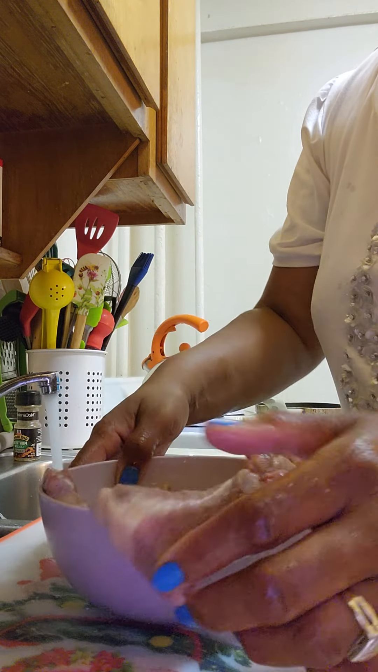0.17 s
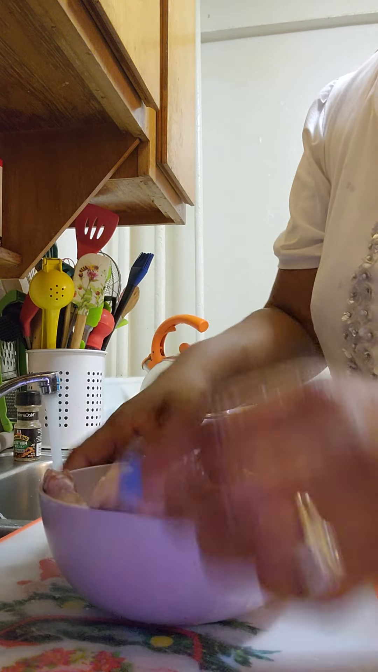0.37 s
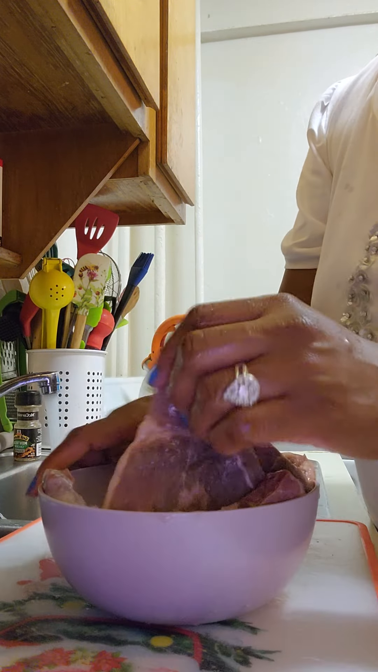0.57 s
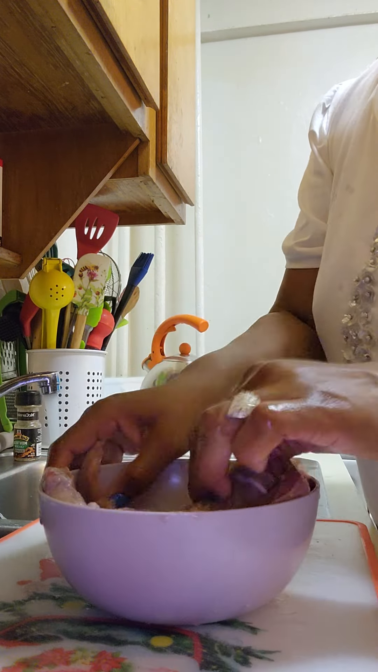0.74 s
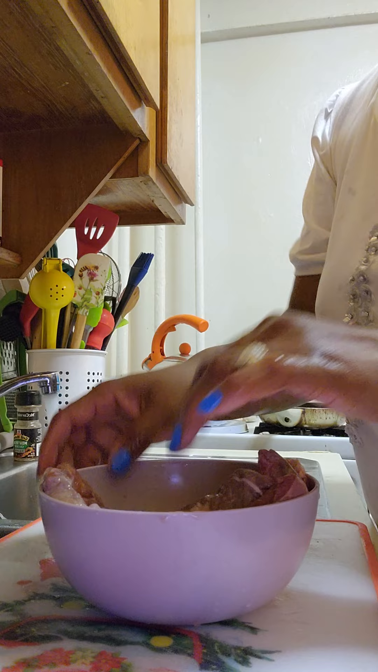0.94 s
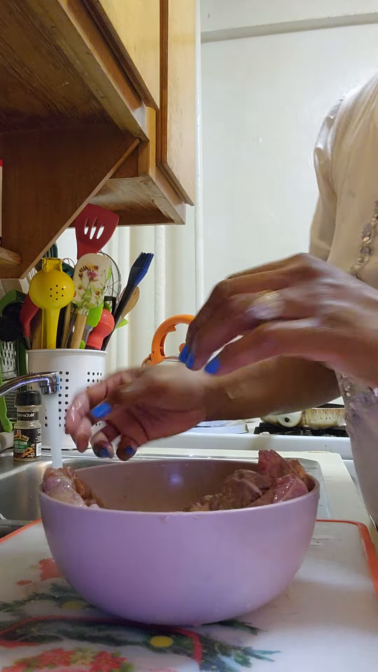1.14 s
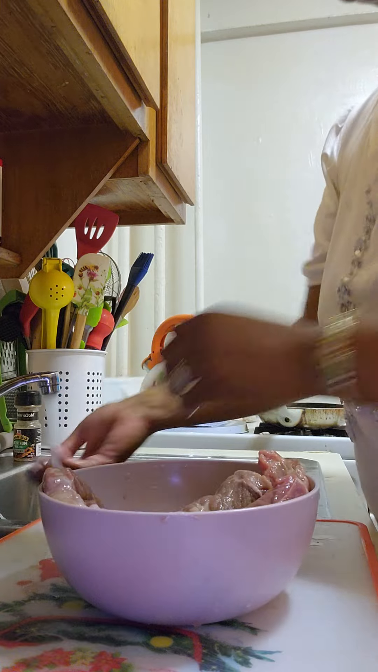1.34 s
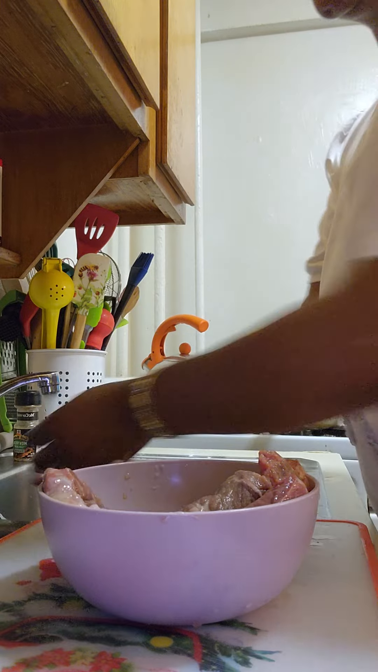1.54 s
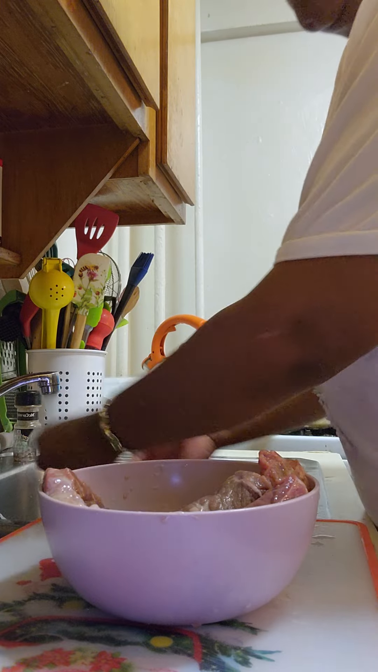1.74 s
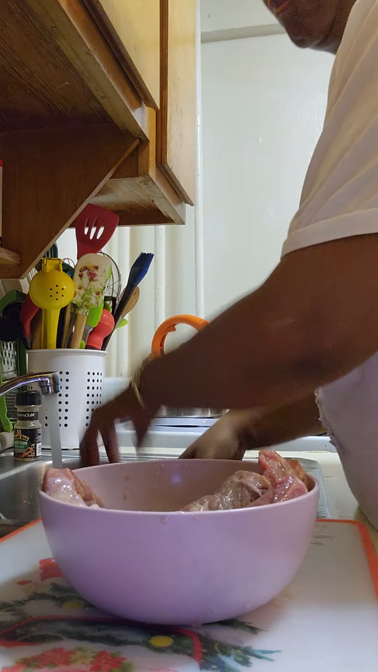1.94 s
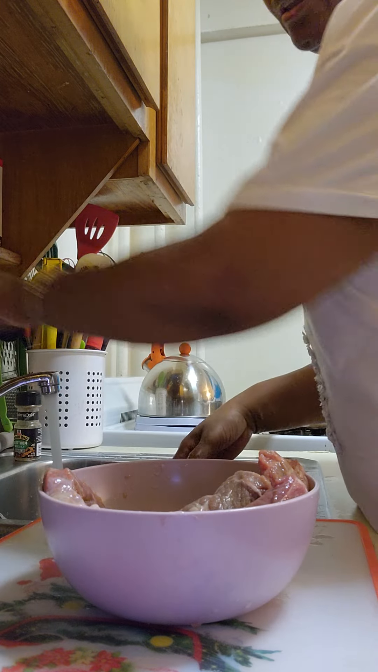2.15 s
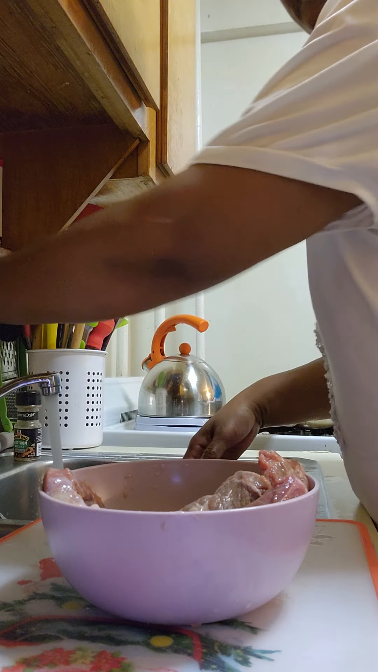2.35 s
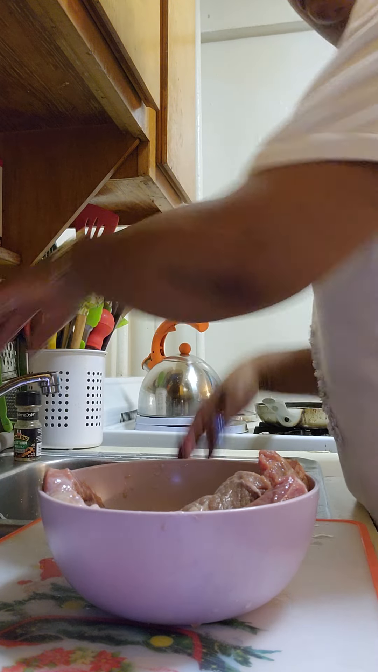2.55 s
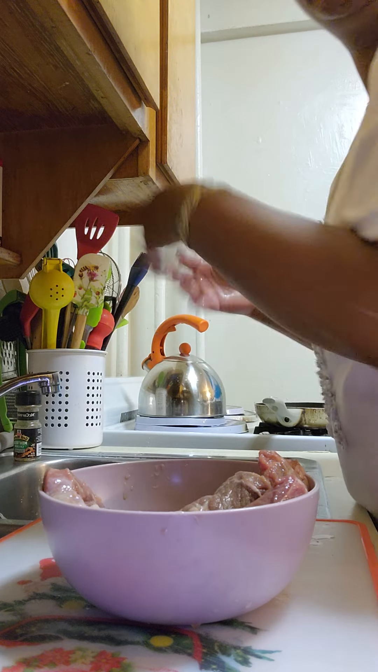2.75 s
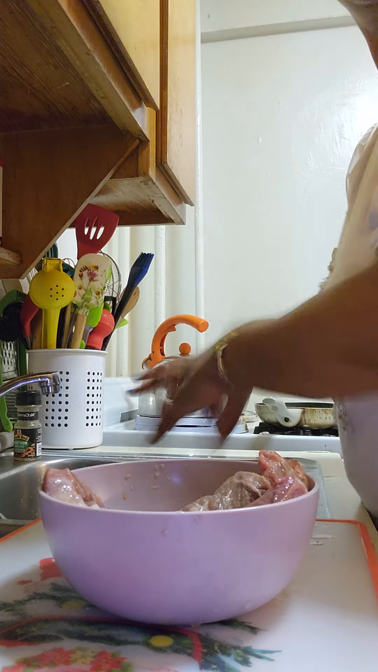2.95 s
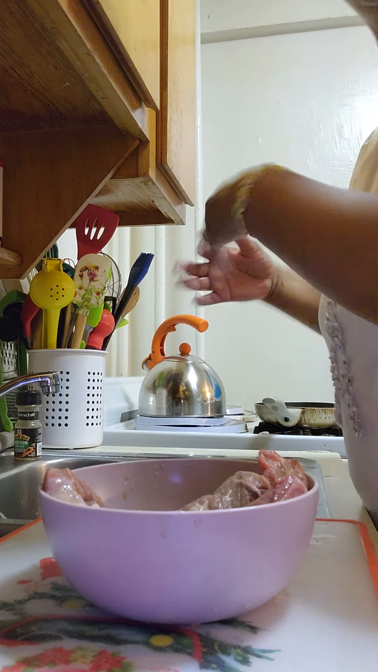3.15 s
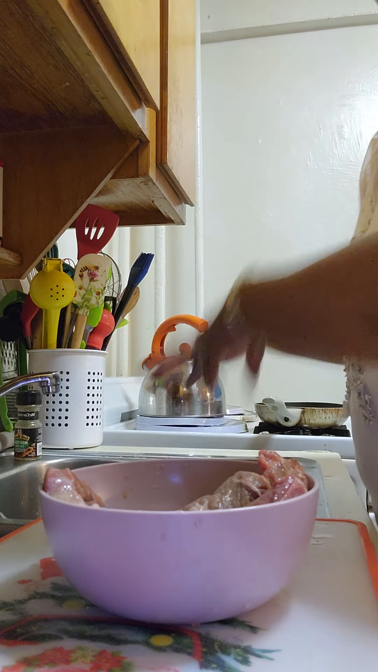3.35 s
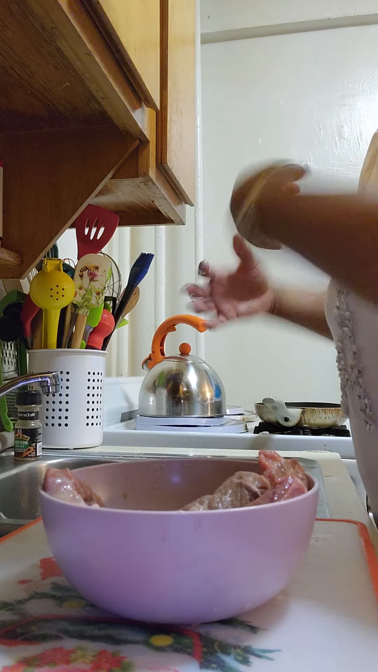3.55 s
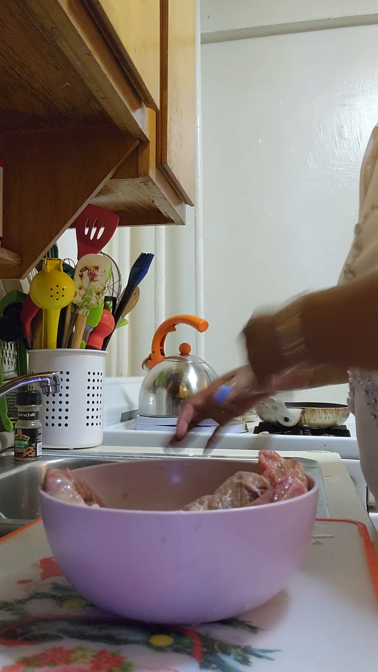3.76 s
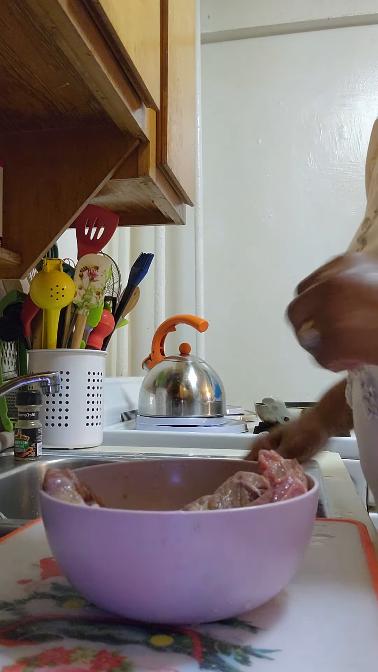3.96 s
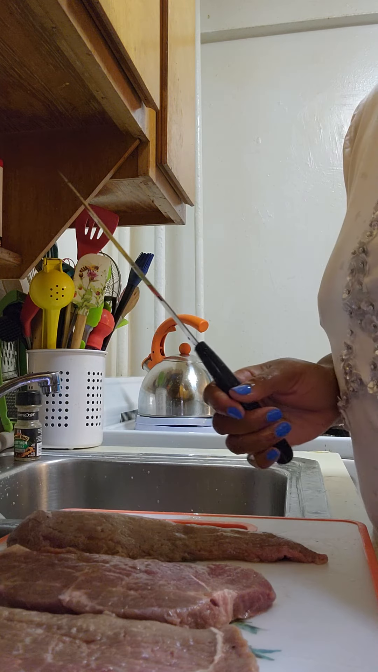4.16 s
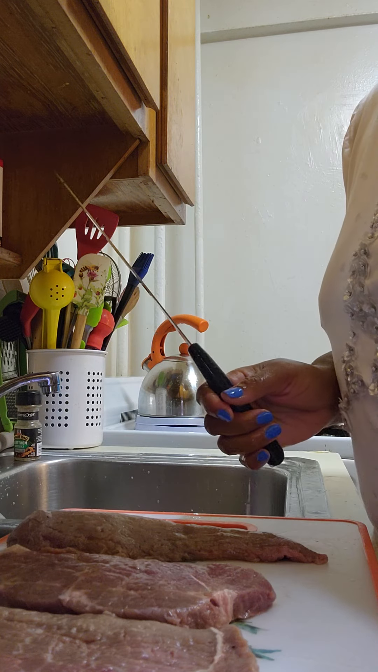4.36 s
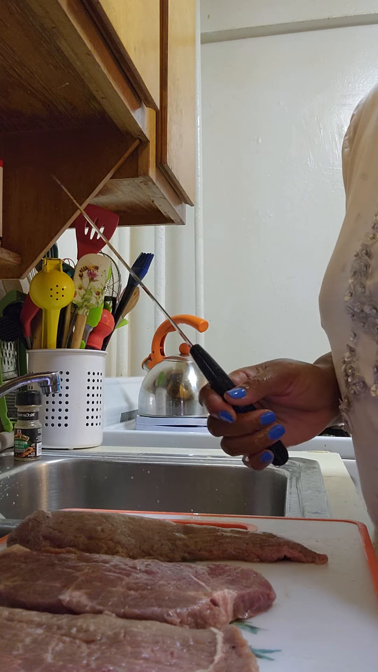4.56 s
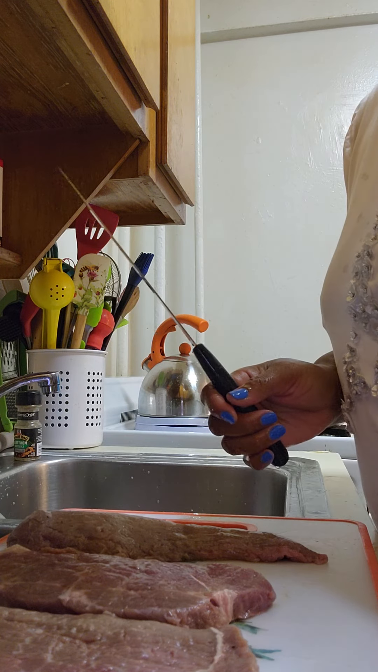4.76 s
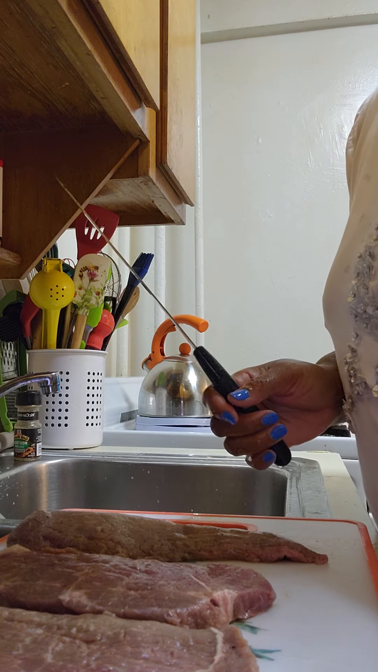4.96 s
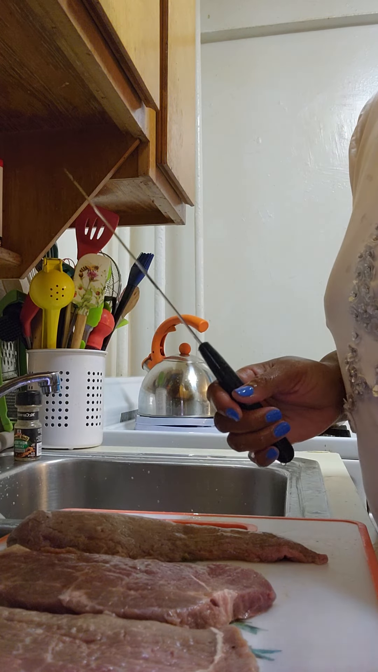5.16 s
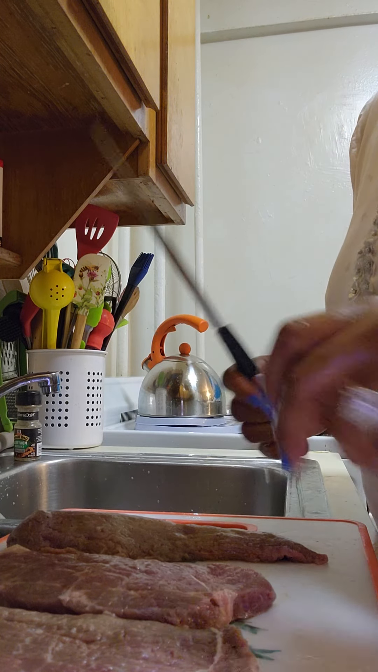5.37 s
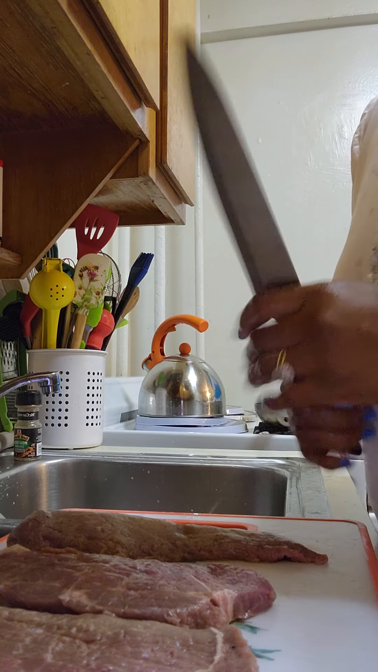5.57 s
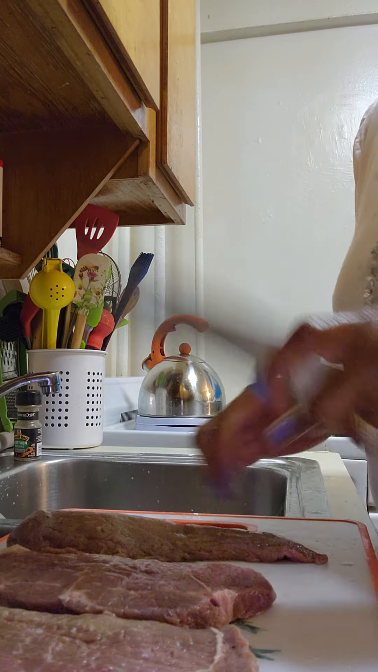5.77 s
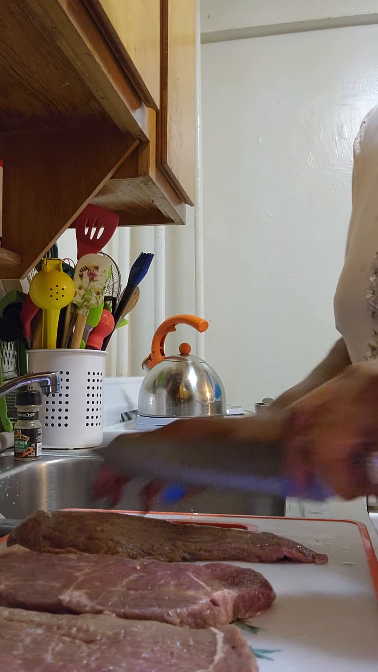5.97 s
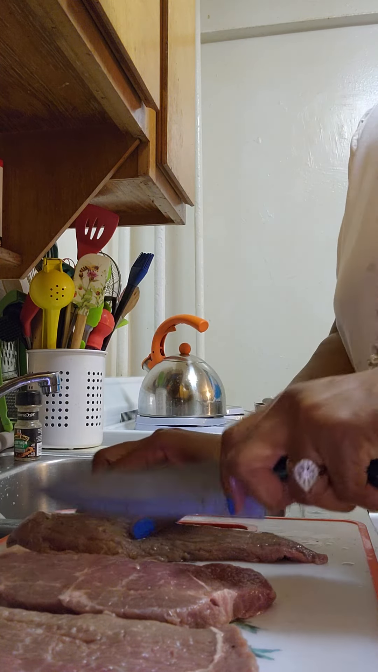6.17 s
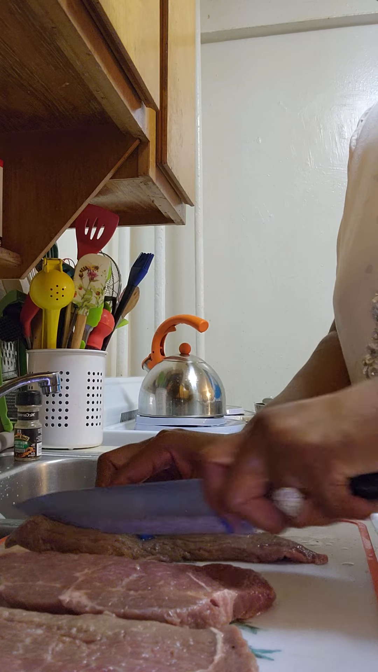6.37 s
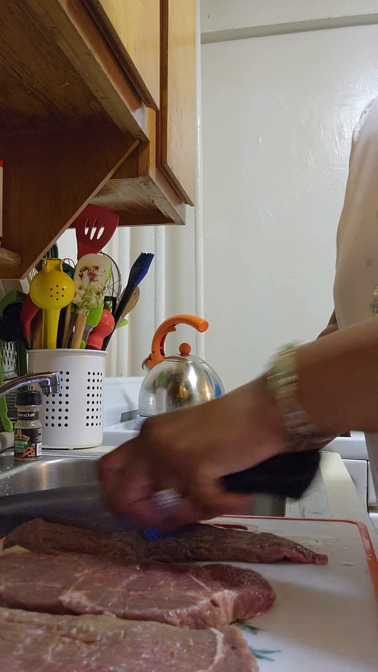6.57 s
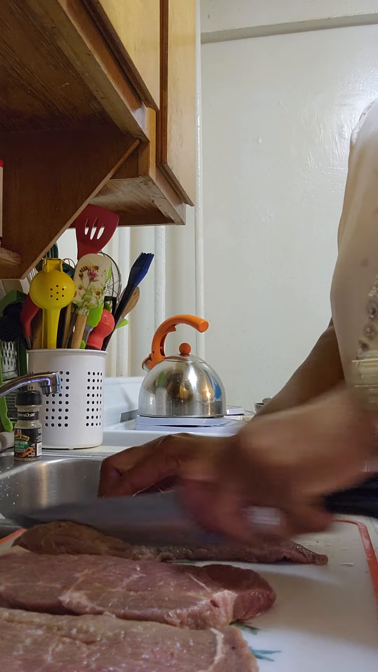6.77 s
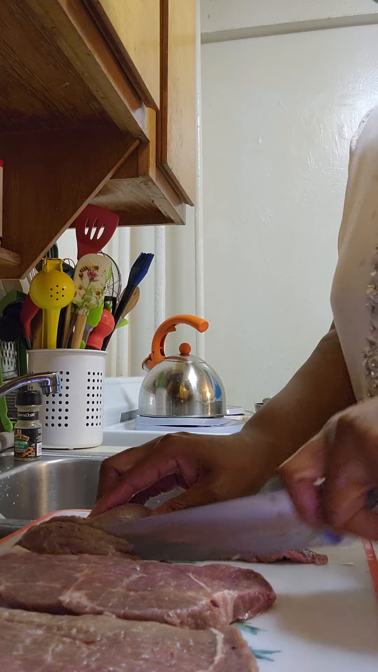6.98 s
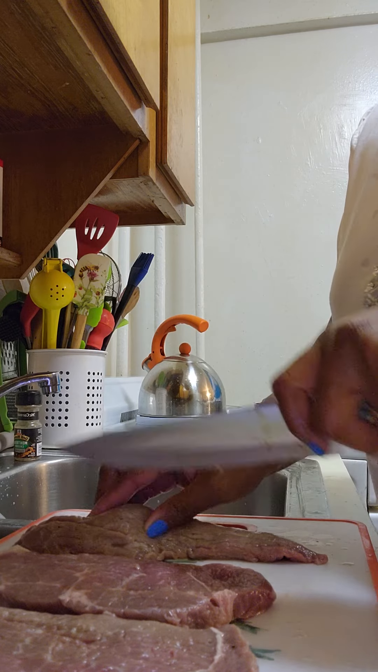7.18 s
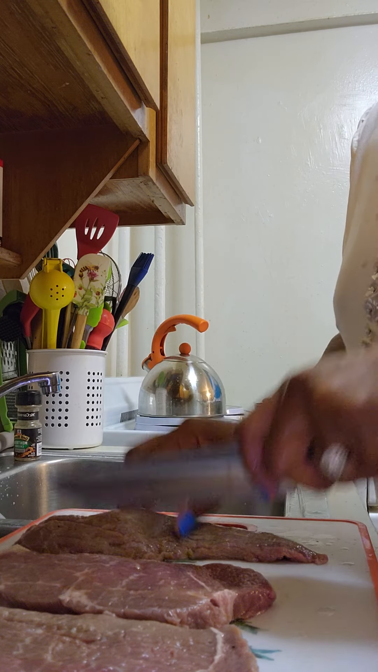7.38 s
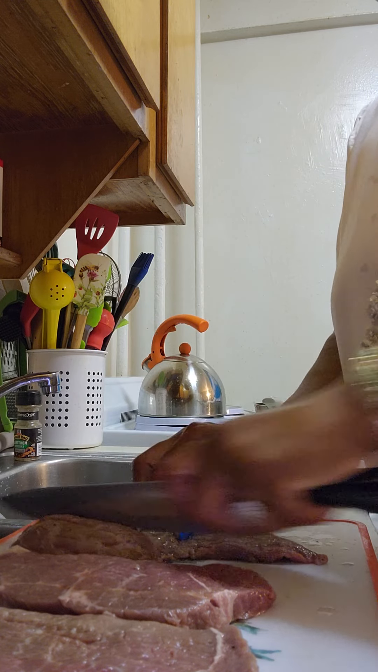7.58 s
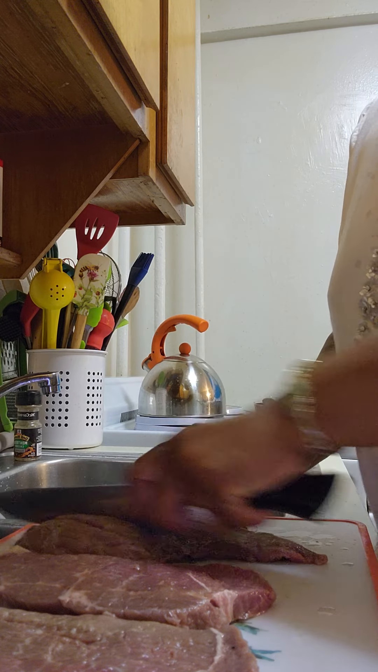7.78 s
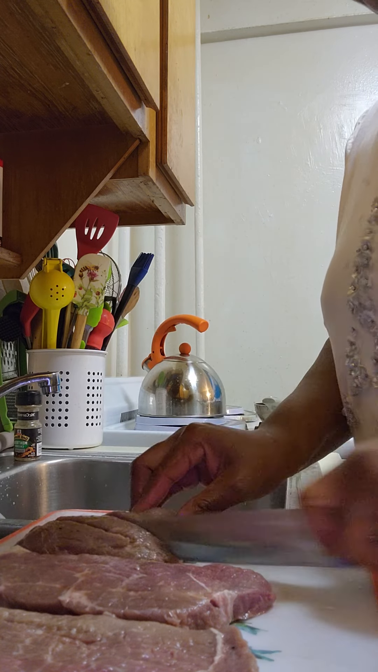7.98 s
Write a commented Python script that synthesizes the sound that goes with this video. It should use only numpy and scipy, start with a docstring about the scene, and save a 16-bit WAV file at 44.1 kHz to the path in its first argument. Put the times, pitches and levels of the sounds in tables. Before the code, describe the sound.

Heavy thump of meat in a plastic bowl over running water, tap closing to a trickle, droplets flicked, then knife knocks and soft meat slicing.

```python
"""A kitchen tap hisses into a steel sink (shaped noise and ringing bubbles) as meat drops into a plastic bowl.
Hands rinse in the jet and shut the tap (level curves); bumps and knocks are damped modes with a noisy crack.
The basin drains in bubbles; wet hands are flicked three times in bursts of noise, and drops ping as resonances.
A knife then knocks on the board and slices meat: a rasp and a drag follow the speed of each stroke.
Room air, motor hum and counter rumble lie beneath; a two-port microphone stands on the counter."""
import sys
import numpy as np
from scipy import signal
from scipy.fft import rfft, irfft, next_fast_len
from scipy.io import wavfile
from scipy.ndimage import map_coordinates

SR = 44100
rng = np.random.default_rng(int(sys.argv[2]) if len(sys.argv) > 2 else 0)


def persist_wave(psi):
    """Save psi, clipped to +-1, as 16-bit WAV."""
    counts = np.round(np.clip(psi, -1, 1) * 32767).astype(np.int16)
    wavfile.write(sys.argv[1], SR, np.atleast_2d(counts).T)


N = 354123
TIME = np.arange(N) / SR
TOP_HZ = 15800  # band limit, also the highest bubble pitch

# Levels in the tables are mix settings, before tremor, trims and echo; spectra are relative.
# spectrum of the jet's fizz: pitch_hz, density_db (per Hz)
JET_SPECTRUM = [(1500, -31.5), (2700, -10.5), (3700, -5.5), (4400, -5.5), (5400, 0.5), (7600, -5.5),
                (8600, -5), (10000, -6.5), (12500, -2), (15500, -5)]
# spectrum of water drumming on the basin: pitch_hz, density_db (per Hz)
BASIN_SPECTRUM = [(100, -2.5), (280, -7.5), (440, -3), (520, -3.5), (650, -11.5), (950, -1.5), (1400, -7),
                  (1850, 0.5), (2250, -1.5), (2600, -7.5), (3500, 4), (6000, -16)]
# narrow resonances of the steel basin: pitch_hz, width_hz, lift_db
STEEL_RESONANCES = [(519, 29, 8), (1830, 110, 7.5), (2232, 47, 9), (3018, 68, 7.5), (3886, 47, 7.5),
                    (4227, 39, 8), (4830, 100, 5), (5110, 110, 4.5), (5640, 130, 5), (6590, 42, 6.5),
                    (6410, 120, 7.5), (6990, 130, 6.5), (7530, 53, 16.5), (7930, 25, 17)]
# pushes on the lever that shut the tap: start_s, length_s, flow_fall_db
LEVER_PUSHES = [(2.439, 0.03, 5.5), (2.571, 0.2, 32)]
# swells of the jet as hands pass through it, then as it strikes the bare basin:
# middle_s, length_s, hiss_lift_db, splatter_lift_db
JET_SWELLS = [(1.407, 0.25, 1, 1), (1.862, 0.2, 1.5, 1), (2.03, 0.16, 2.5, 5), (2.268, 0.6, 0, 2)]
HISS_DB, SPLATTER_DB = -38.5, -44.5  # the jet and its drumming on the basin
CREEP_DB_PER_S = 0.5  # the running water slowly gains strength
SHUT_S, DRY_DB_PER_S = 2.75, 22  # once the valve is shut the jet runs dry

# spectrum of the still room's air: pitch_hz, density_db (per Hz)
AIR_SPECTRUM = [(100, -7.5), (240, 1.5), (450, -9), (750, -13.5), (1100, -19.5), (2000, -22.5), (2650, -31),
                (3100, -26.5), (5000, -31), (7300, -35), (9000, -52), (15000, -67)]
# spectrum of the counter's rumble: pitch_hz, density_db (per Hz)
RUMBLE_SPECTRUM = [(20, -27), (40, 2), (62, 1.5), (95, 5), (120, 0.5), (160, -27), (300, -59)]
# tones of an appliance motor: pitch_hz, level_db
MOTOR_HUM = [(58.5, -51), (236, -71)]
# the cook shifts weight and shakes the counter: middle_s, length_s, sway_db, boom_db
WEIGHT_SHIFTS = [(.33, 0.73, -53, -42.5), (1.362, 0.68, -50, -62.5), (2.48, 1.44, -41.5, -38),
                 (3.08, 0.15, -57, -44.5), (3.34, 0.9, -54.5, -61), (5.175, 0.51, -48.5, -90),
                 (5.793, .3, -45, -74), (6.44, 0.95, -44.5, -69), (7.118, 0.32, -46.5, -57),
                 (7.677, 0.37, -41.5, -58)]
AIR_DB, RUMBLE_DB = -60.5, -55
SWAY_HZ = 74.5  # parts the deep sway from the boom

# meat lands in the bowl, which rocks on the board: start_s, thump_db, knock_db, crack_db
MEAT_IN_BOWL = [(.1358, -7.5, -15, -16.5), (.1645, -17, -25, -26), (.194, -18.5, -40, -41)]
# ringing modes of the bowl: pitch_hz, level_db, t60_s
BOWL_MODES = [(73.8, -6, 0.46), (97.5, -3.5, 0.59), (126.8, 3, 0.24), (177.7, 0.5, 0.11), (207.7, -2, 0.24),
              (246.3, -2, .3), (279.3, -3.5, 0.18), (404.4, -7, 0.25), (507, -5.5, 0.11), (579, -17, 0.153),
              (650, -26.5, .07), (870, -15, 0.047), (1380, 4, 0.037), (2273, -14, 0.052)]
# the body and the lever bump the sink unit: start_s, thump_db, knock_db, crack_db
SINK_BUMPS = [(2.098, -29, -50, -70), (2.425, -32, -31.5, -49), (2.499, -22.5, -35.5, -42),
              (2.55, -23.5, -40, -55), (4.06, -35.5, -65, -78)]
# ringing modes of the sink unit: pitch_hz, level_db, t60_s
SINK_MODES = [(46, 10, 0.099), (74.6, 6, 0.19), (114.7, -0.5, 0.26), (235.3, 0.5, 0.23), (300, -4, 0.17),
              (373, 1.5, 0.15), (480, -4, 0.15)]
# the knife meets the cutting board: start_s, thump_db, knock_db, crack_db
KNIFE_KNOCKS = [(6.18, -29, -37.5, -44.5), (6.395, -41, -66, -74), (6.778, -47, -50, -52),
                (7.3295, -25, -32.5, -28), (7.4882, -29.5, -38, -42), (7.8274, -43, -46.5, -50),
                (7.985, -32.5, -50.5, -69)]
# ringing modes of the board and what stands on it: pitch_hz, level_db, t60_s
BOARD_MODES = [(67.9, 0.5, 0.42), (85.5, 1.5, 0.73), (141, -12.5, 0.19), (177.6, -2, 0.24), (218, -3, 0.18),
               (308, 0, 0.074), (360.5, -2, 0.21), (389, -3.5, 0.15), (523, -3, 0.11), (580, -5, 0.18),
               (688, -2, 0.054), (860, 3.5, 0.019), (1120, -4, 0.04), (1420, -1.5, 0.041),
               (1640, -20.5, 0.062), (1840, -25.5, 0.051)]
# spectrum of the hard contact of a blow: pitch_hz, density_db (per Hz)
CRACK_SPECTRUM = [(150, 19), (350, 12.5), (620, 7.5), (950, 4.5), (2200, 2), (3500, -5), (6000, -14),
                  (7500, -27.5), (10000, -56.5)]

DRAIN_S, DRAIN_DB, DRAIN_RISE_S, DRAIN_T60_S = 1.9, -56, 0.28, 2.2  # the pool in the basin runs off
TRICKLE_DB, TRICKLE_T60_S = -63, 7.2  # a thin trickle outlasts it
# light clicks, some of the tap and the knife, one thin, dry and broad at 5.02 s:
# start_s, peak_db, pitch_hz, burst_t60_s, width_hz
LIGHT_CLICKS = [(2.737, -47, 5100, 0.088, 2530), (4.845, -63.5, 6300, 0.058, 2500),
                (5.0235, -42, 1700, 0.0014, 6500), (5.3176, -41, 5730, 0.006, 2300),
                (7.1214, -32.5, 5200, .003, 1050), (7.121, -31.5, 2500, 0.049, 3000)]
# drops fall into the sink: start_s, peak_db, pitch_hz
DROPS = [(3.122, -48.5, 2080), (3.1615, -41.5, 2770), (3.578, -53, 5560), (3.6265, -46, 2840),
         (3.627, -56, 5440), (4.0676, -57.5, 2590), (4.2899, -66, 5800), (4.6256, -58, 6350)]
DRIP_T60_S, DRIP_WIDTH = 0.054, 0.17  # a drop's burst, and its width as a share of its pitch
# water flicked off the hands: start_s, level_db, hold_s
HAND_FLICKS = [(3.006, -45.5, .038), (3.416, -44.5, 0.0034), (3.807, -47.5, 0.0048)]
# spectrum of the spray, also lent to rubbing: pitch_hz, density_db (per Hz)
SPRAY_SPECTRUM = [(400, -22.5), (1000, -9.5), (1500, -11.5), (2000, -3.5), (2700, -10), (3500, -7.5),
                  (5500, -14), (7500, -16.5), (10000, -27), (15000, -27)]
FLICK_RISE_S, FLICK_T60_S = 0.054, 0.12  # rise is the 60 dB swell, played as a decay backwards
# soft rubbing of hands and cloth: middle_s, length_s, level_db
SOFT_RUBS = [(3.818, 0.25, -61.5), (3.961, 0.18, -62), (4.778, 0.38, -81), (5.75, 0.34, -75)]
# strokes of the blade through the meat: start_s, end_s, rise_s, stop_s, rasp_db, drag_db
BLADE_STROKES = [(6.35, 6.695, 0.34, 0.054, -60, -61), (6.741, 7.1, 0.052, 0.15, -61, -53.5),
                 (7.54, 7.789, 0.066, 0.042, -60, -69), (7.832, 8.2, 0.047, .06, -55, -54)]
# spectrum of parting meat fibres: pitch_hz, density_db (per Hz)
FIBRE_SPECTRUM = [(300, 12), (700, -2), (1000, -5), (1800, 3.5), (2600, -7.5), (3100, 2.5), (4000, -1),
                  (5500, -2), (7500, -3.5), (9500, -10.5), (15000, -13)]
BOARD_SHAKE_DB = 10.5  # the counter's rumble over the drag of the blade
RUB_TREMOR_DB, RASP_TREMOR_DB = 1.8, 2.1  # skin and blade catch and slip as they move

# likeness of left and right noise: pitch_hz, correlation (no unit)
STEREO_LIKENESS = [(100, 0.96), (300, 0.99), (700, 0.63), (1400, 0.12), (3000, 0.3), (6000, 0.055)]
# decay of the room's diffuse tail: pitch_hz, t60_s
ROOM_DECAY = [(100, .4), (500, 0.34), (3000, 0.16), (12000, 0.063)]
# colour of the right microphone port: pitch_hz, gain_db
RIGHT_PORT = [(200, 0.5), (700, 3.5), (1400, 2.5), (2700, 3), (4000, 4.5), (5000, 12.5), (6300, 14),
              (7200, 9.5), (8000, -15.5), (8800, -29), (10000, -15.5), (11500, 5.5), (13000, 11),
              (15500, 6)]


def amp(db):
    """Decibels to gain."""
    return 10 ** (np.asarray(db) / 20)


def unit(x):
    """Scale to rms 1."""
    return x / np.sqrt(np.mean(x ** 2) + 1e-20)


def along(points, hz):
    """Read (pitch, value) points on a log pitch axis."""
    f, v = np.transpose(points)
    return np.interp(np.log(hz + 1), np.log(f), v)


def wobble(rate):
    """A smooth random curve, rate knots a second."""
    knots = rng.standard_normal(int(N * rate / SR) + 4)
    return map_coordinates(knots, [TIME * rate])


def ramp(start, length):
    """Rise from 0 to 1 over length seconds."""
    return np.clip((TIME - start) / length, 0, 1)


def swell(middle, length):
    """A smooth hump of height 1."""
    return np.sin(np.pi * ramp(middle - length / 2, length)) ** 2


def fade(t, t60):
    """Exponential decay from t = 0, silent before."""
    return (t >= 0) * np.exp(-np.log(1000) * np.maximum(t, 0) / t60)


def filtered(x, response):
    """Shape the spectrum of x by a response of frequency."""
    m = next_fast_len(N + SR // 2)
    return irfft(rfft(x, m) * response(np.fft.rfftfreq(m, 1 / SR)), m)[..., :N]


def resonance(f, hz, width):
    """Response of one damped mode, 1 at its centre."""
    return 1j * f * width / (hz * hz - f * f + 1j * f * width)


def lifted(x, peaks):
    """Pass x through narrow resonances that stand above its own spectrum."""
    return filtered(x, lambda f: 1 + sum((amp(db) - 1) * resonance(f, hz, width) for hz, width, db in peaks))


def add(track, s, sound):
    """Mix a sound into a track at time s."""
    start = round(s * SR)
    track[..., start:start + sound.shape[-1]] += sound[..., :N - start]


def rush(spectrum, grain_db=0):
    """Shaped stereo noise of rms 1, whose strength flickers by grain_db."""
    grains = rng.standard_normal((2, N)) * amp(grain_db * wobble(900))

    def mid_side(hz):
        turn = np.arccos(np.clip(along(STEREO_LIKENESS, hz), -1, 1)) / 2
        return amp(along(spectrum, hz)) * np.array([np.cos(turn), np.sin(turn)])

    mid, side = filtered(grains, mid_side)
    return unit(np.array([mid + side, mid - side]))


def bubbles(count, centre_hz, spread, cycles, size_db):
    """Damped rings of random pitch and size, at most 12.5 ms long, together of rms 1."""
    t = np.arange(SR // 80) / SR
    start = rng.integers(0, N, (count, 1))
    hz = np.minimum(centre_hz * np.exp(spread * rng.standard_normal((count, 1))), TOP_HZ)
    size = amp(size_db * np.minimum(rng.exponential(size=(count, 1)), 4))
    rings = size * fade(t, cycles / hz) * np.sin(2 * np.pi * hz * t)
    where = (start + np.arange(len(t))).ravel()
    sides = []
    for _ in range(2):
        weighted = rings * rng.standard_normal((count, 1))  # each side hears its own strengths
        sides.append(np.bincount(where, weighted.ravel(), N)[:N])
    return unit(np.array(sides))


def echo(x, decay, wet_db):
    """Add a diffuse tail, 4 ms late, in which each frequency dies at its own speed."""
    hz, t, z = signal.stft(rng.standard_normal((2, SR // 2)), SR, nperseg=256)
    tail = signal.istft(z * fade(t, along(decay, hz)[:, None]), SR, nperseg=256)[1]
    tail = np.pad(tail / np.linalg.norm(tail[0]), ((0, 0), (SR // 250, 0)))
    return x + amp(wet_db) * signal.fftconvolve(x, tail, axes=1)[:, :N]


def tap():
    """The aerated jet fizzes and drums on the resonant steel basin; the lever sets the flow."""
    creep_db = CREEP_DB_PER_S * (np.minimum(TIME, SHUT_S) - 1)
    lever_db = sum(fall * ramp(s, length) for s, length, fall in LEVER_PUSHES)
    dry_db = DRY_DB_PER_S * np.maximum(TIME - SHUT_S, 0)
    flow_db = creep_db - lever_db - dry_db + 0.5 * wobble(44.9)
    hiss_db = HISS_DB + sum(lift * swell(s, length) for s, length, lift, _ in JET_SWELLS)
    splatter_db = SPLATTER_DB + sum(lift * swell(s, length) for s, length, _, lift in JET_SWELLS)
    splatter_db = splatter_db + 0.93 * wobble(18)
    fizz_bubbles = bubbles(count=9000, centre_hz=5350, spread=0.18, cycles=160, size_db=3.5)
    fizz = rush(JET_SPECTRUM, grain_db=1.0) + amp(-11.0) * fizz_bubbles
    # after the first push the weak jet breaks into larger drops and loses some of its finest fizz
    weak = ramp(*LEVER_PUSHES[0][:2])
    fizz = fizz - 0.44 * weak * filtered(fizz, lambda hz: hz ** 8 / (hz ** 8 + 8400.0 ** 8))
    drum_bubbles = bubbles(count=3000, centre_hz=2055, spread=0.25, cycles=30, size_db=2)
    drum = rush(BASIN_SPECTRUM, grain_db=1.0) + amp(-12) * drum_bubbles
    water = amp(flow_db) * (amp(hiss_db) * fizz + amp(splatter_db) * drum)
    return echo(lifted(water, STEEL_RESONANCES), [(500, 0.065), (6000, 0.044)], wet_db=-8.0)


def kitchen():
    """Room air, a wavering motor hum and the counter's rumble, which swells when the cook moves."""
    rumble = rush(RUMBLE_SPECTRUM)
    deep = filtered(rumble, lambda hz: 1 / (1 + (hz / SWAY_HZ) ** 8))
    sway = sum(amp(db) * swell(s, length) for s, length, db, _ in WEIGHT_SHIFTS)
    boom = sum(amp(db) * swell(s, length) for s, length, _, db in WEIGHT_SHIFTS)
    counter = amp(RUMBLE_DB) * rumble + sway * unit(deep) + boom * unit(rumble - deep)
    hum = np.zeros(N)
    for hz, db in MOTOR_HUM:
        level = amp(db + 2.0 * wobble(1.8)) * np.sqrt(2)  # table level is rms
        hum += level * np.sin(2 * np.pi * hz * TIME + 0.5 * wobble(2.7))
    air = amp(AIR_DB + 1.2 * wobble(11)) * rush(AIR_SPECTRUM, grain_db=0.0)
    return hum + air + counter


def struck(blows, modes, crack_t60, wet_db):
    """A blow cracks at the contact and rings the object; deep modes travel through the counter."""
    t = np.arange(SR // 2) / SR
    thumps, body, contact = np.zeros((3, N))
    for s, thump_db, knock_db, crack_db in blows:
        deep, high = np.zeros((2, len(t)))
        for k, (hz, db, t60) in enumerate(modes):
            level = amp(db + 1.4 * rng.standard_normal())  # each blow excites the modes a little differently
            ring = level * fade(t, t60) * np.sin(2 * np.pi * hz * t) * (-1) ** k
            if hz < 160:
                deep += ring
            else:
                high += ring
        # the last factor softens each onset over about a millisecond
        add(thumps, s, amp(thump_db - 5.0) * deep * (1 - np.exp(-t / 0.001)))
        add(body, s, amp(knock_db - 4.5) * high * (1 - np.exp(-t / 0.0009)))
        add(contact, s, amp(crack_db + 2.0) * fade(t, crack_t60) * (1 - np.exp(-t / 0.00067)))
    airborne = body * amp([[-1.5], [0]]) + contact * rush(CRACK_SPECTRUM, grain_db=3)
    return thumps + echo(airborne, ROOM_DECAY, wet_db)


def knocks():
    """Blows set the bowl, the sink unit and the cutting board ringing, each in its own modes."""
    bowl = struck(MEAT_IN_BOWL, BOWL_MODES, crack_t60=0.12, wet_db=-12)
    sink = struck(SINK_BUMPS, SINK_MODES, crack_t60=0.21, wet_db=-16.0)
    board = struck(KNIFE_KNOCKS, BOARD_MODES, crack_t60=0.043, wet_db=-6.5)
    return bowl + sink + board


def draining():
    """The last water runs across the basin in bubbles, thins to a trickle and dies away."""
    since = np.maximum(TIME - DRAIN_S, 0)
    left = amp(DRAIN_DB) * fade(since, DRAIN_T60_S) + amp(TRICKLE_DB) * fade(since, TRICKLE_T60_S)
    onset = fade(np.maximum(DRAIN_S - TIME, 0), DRAIN_RISE_S)
    gurgle = bubbles(count=4000, centre_hz=2700, spread=0.42, cycles=68, size_db=1)
    return echo(onset * left * gurgle, ROOM_DECAY, wet_db=-7.5)


def ticks():
    """Drops and light clicks: a brief burst rings a resonance; a narrow one pings, a wide one clicks."""
    t = np.arange(SR // 4) / SR
    f = np.fft.rfftfreq(len(t), 1 / SR)
    track = np.zeros((2, N))
    drips = [(s, db, hz, DRIP_T60_S, DRIP_WIDTH * hz) for s, db, hz in DROPS]
    for s, db, hz, t60, width in drips + LIGHT_CLICKS:
        burst = rng.standard_normal((2, len(t))) * fade(t, t60)
        ping = irfft(rfft(burst) * resonance(f, hz, width) ** 2)
        add(track, s, amp(db) * ping / np.abs(ping).max(axis=1, keepdims=True))
    return echo(track, ROOM_DECAY, wet_db=-13.5)


def flicks():
    """A shaken hand throws a cloud of droplets that patters into the sink."""
    shower = np.zeros(N)
    for s, db, hold in HAND_FLICKS:
        rise = fade(np.maximum(s - TIME, 0), FLICK_RISE_S)
        fall = fade(np.maximum(TIME - s - hold, 0), FLICK_T60_S)
        shower += amp(db) * rise * fall
    return echo(shower * rush(SPRAY_SPECTRUM, grain_db=1.0), ROOM_DECAY, wet_db=-8.5)


def rubbing():
    """Wet skin brushes skin and cloth in soft, uneven swells."""
    contact = sum(amp(db) * swell(s, length) for s, length, db in SOFT_RUBS)
    return contact * amp(RUB_TREMOR_DB * wobble(35)) * rush(SPRAY_SPECTRUM, grain_db=2.0)


def slicing():
    """The blade parts wet fibres: snapping rasp, dull drag and counter rumble follow each stroke's speed."""
    cut, drag = np.zeros((2, N))
    for start, end, rise, stop, rasp_db, drag_db in BLADE_STROKES:
        speed = ramp(start, rise) * (1 - ramp(end - stop, stop))
        cut += amp(rasp_db) * speed ** 1.3
        drag += amp(drag_db) * np.sqrt(speed)
    snaps = bubbles(count=2500, centre_hz=4600, spread=0.27, cycles=52, size_db=2)
    fibres = rush(FIBRE_SPECTRUM, grain_db=1.5) + amp(-16) * snaps
    rasp = cut * amp(RASP_TREMOR_DB * wobble(40)) * fibres
    dull = amp(-1.5) * rush(AIR_SPECTRUM, grain_db=-0.5)
    shake = amp(BOARD_SHAKE_DB) * rush(RUMBLE_SPECTRUM)
    return echo(rasp, ROOM_DECAY, wet_db=-5.5) + drag * (dull + shake)


def nearby(x, gain):
    """Bowl, board and cupboard throw quick reflections that comb the treble at each port."""
    delays = rng.uniform(0.0011, 0.009, (2, 8))  # seconds
    copies = np.zeros((2, N))
    for side in range(2):
        for delay in delays[side]:
            late = np.pad(x[side], (round(delay * SR), 0))[:N]
            copies[side] += late * rng.choice([-1, 1])
    return x + gain * filtered(copies, lambda hz: hz ** 2 / (hz ** 2 + 900 ** 2))


def scene():
    """Everything at the sink and the board; all but the tap gets the quick reflections."""
    close = kitchen() + knocks() + draining() + ticks() + flicks() + rubbing() + slicing()
    return tap() + nearby(close, gain=0.12)


def record(dry):
    """The right port colours its channel; a 300 Hz wide slope closes the band around its limit."""
    ports = np.array([dry[0], filtered(dry[1], lambda hz: amp(along(RIGHT_PORT, hz)))])
    return filtered(ports, lambda hz: np.clip((TOP_HZ - hz) / 300 + 0.5, 0, 1))


dry = scene()
out = record(dry)
persist_wave(out)
```